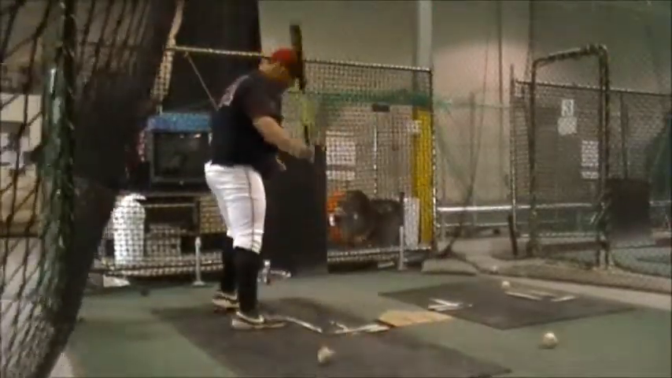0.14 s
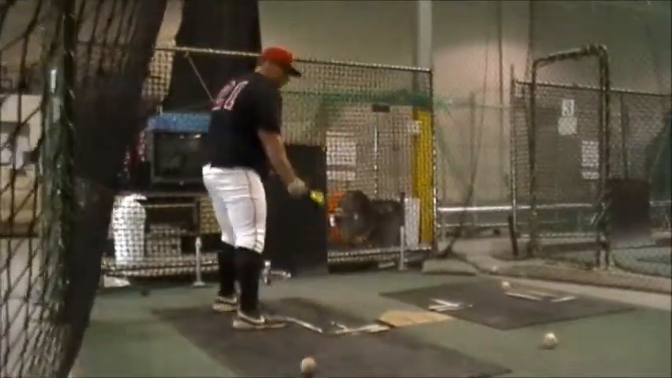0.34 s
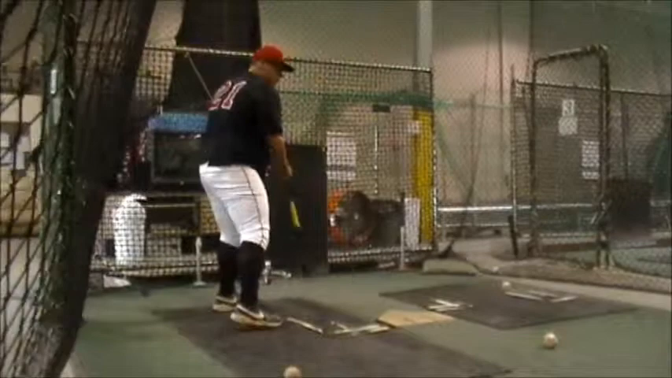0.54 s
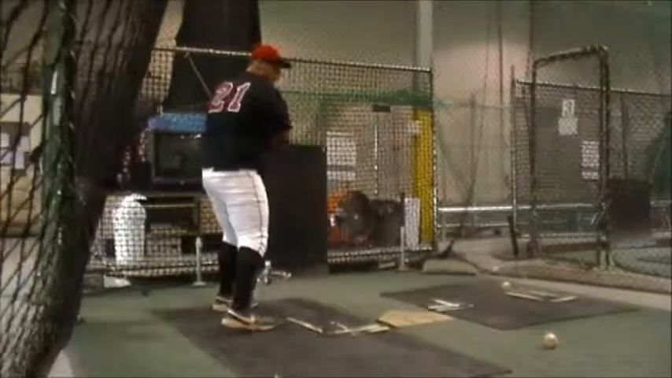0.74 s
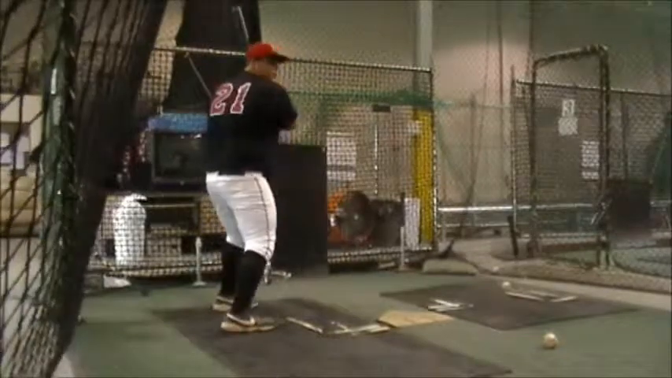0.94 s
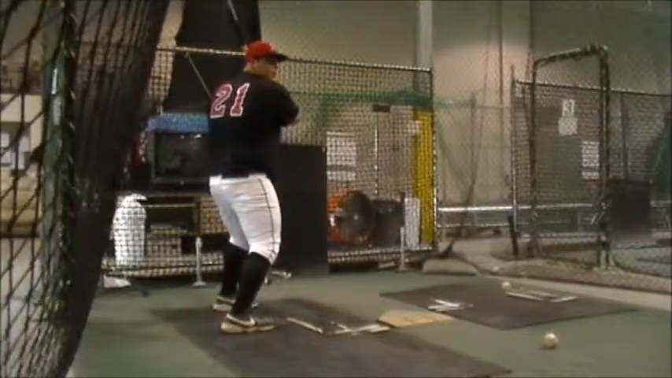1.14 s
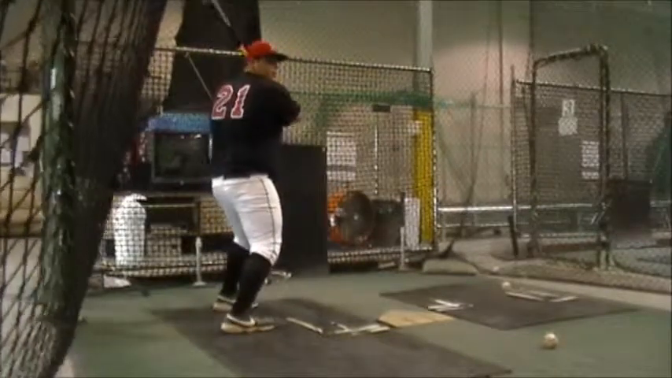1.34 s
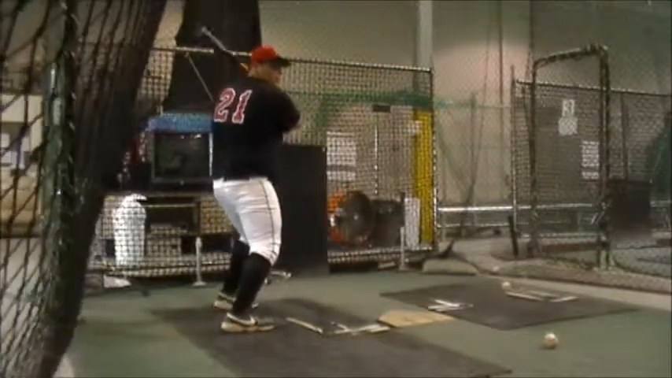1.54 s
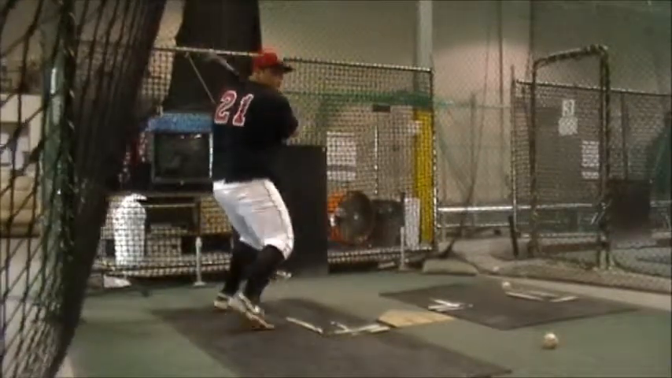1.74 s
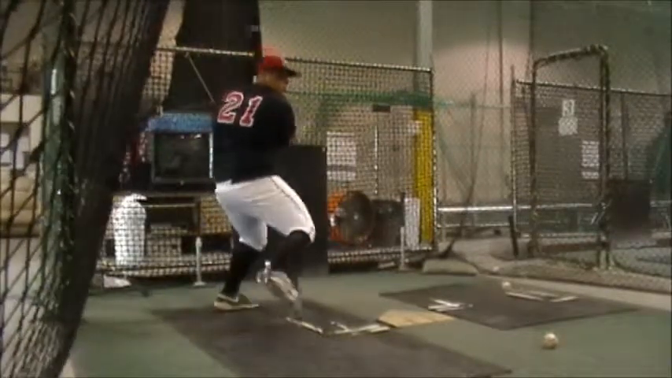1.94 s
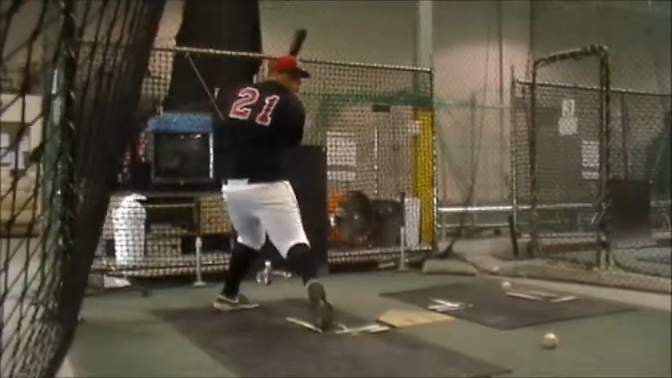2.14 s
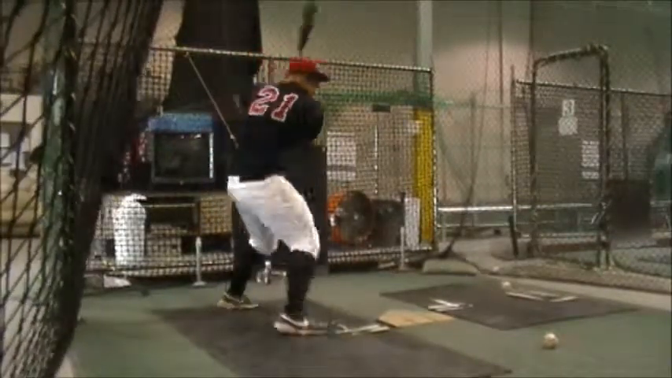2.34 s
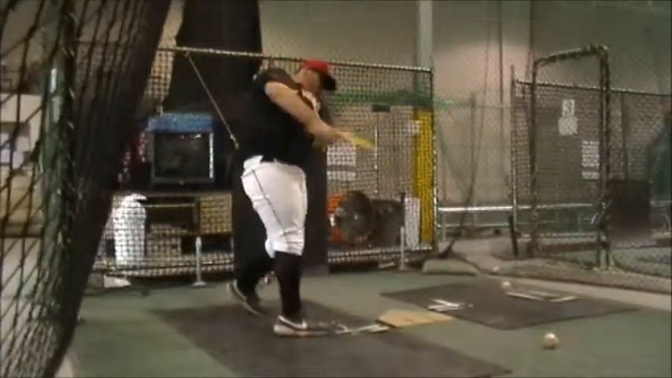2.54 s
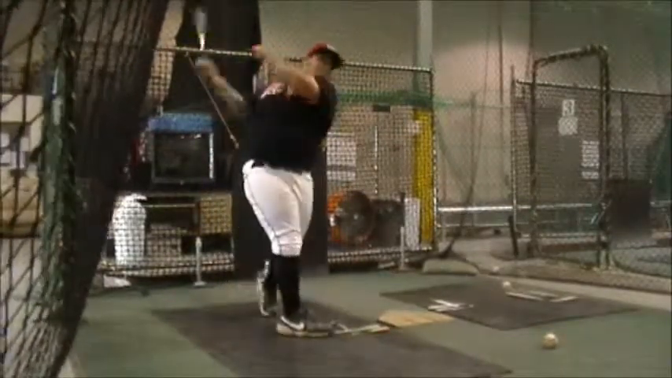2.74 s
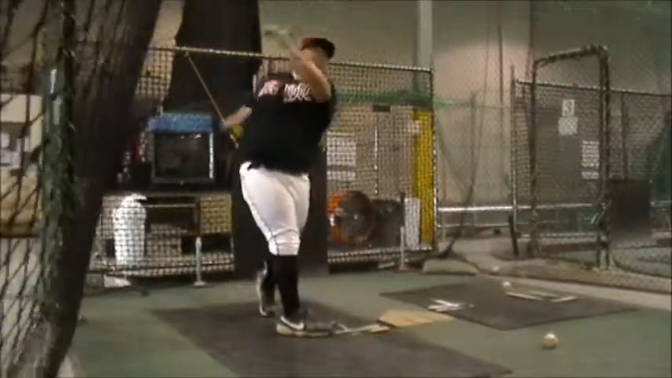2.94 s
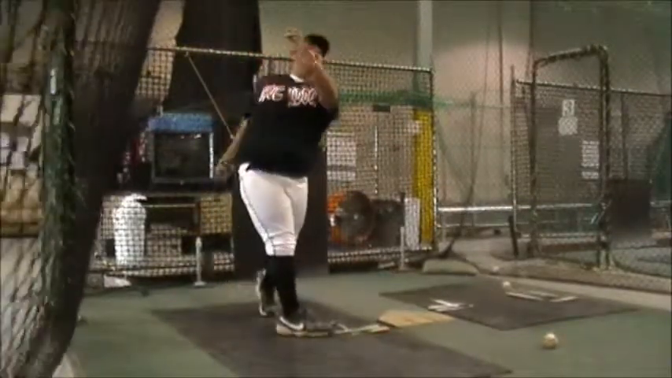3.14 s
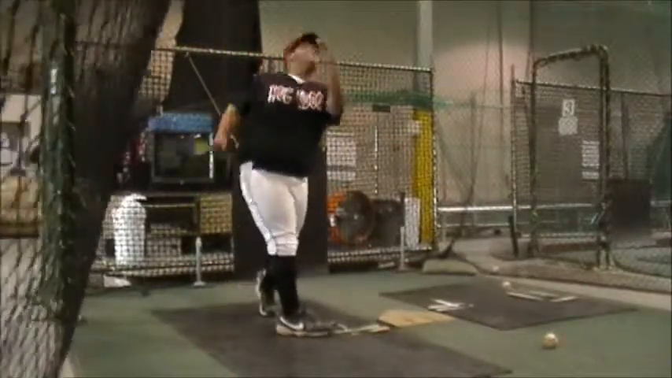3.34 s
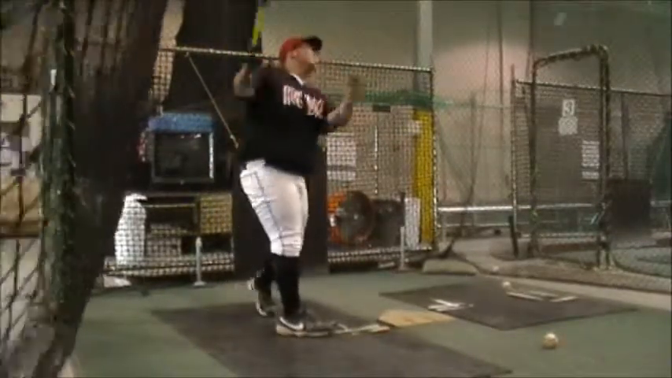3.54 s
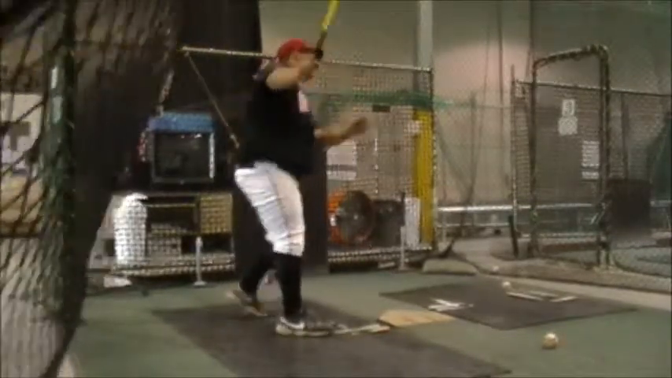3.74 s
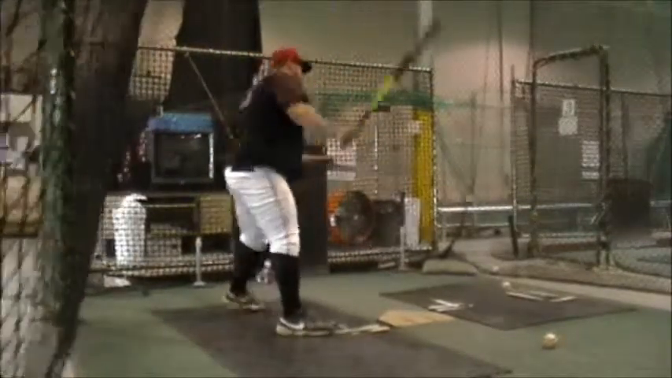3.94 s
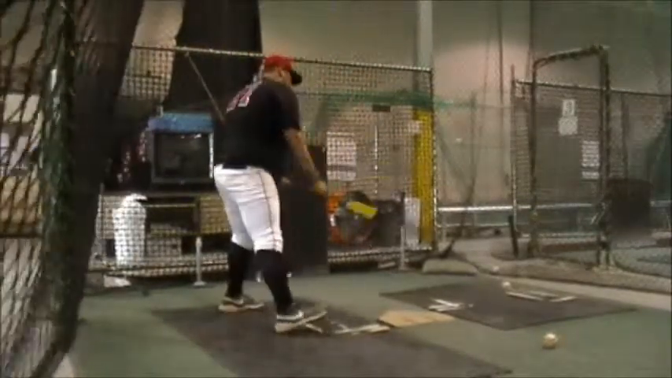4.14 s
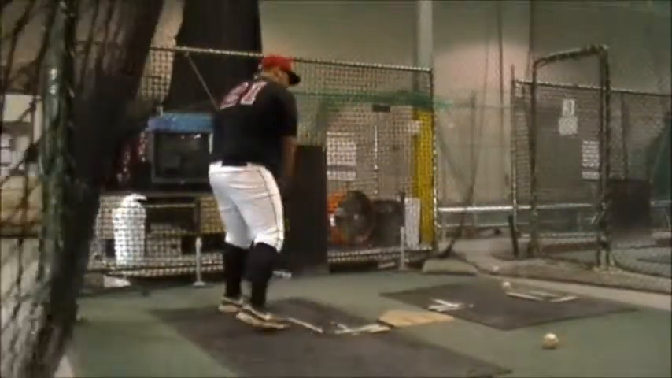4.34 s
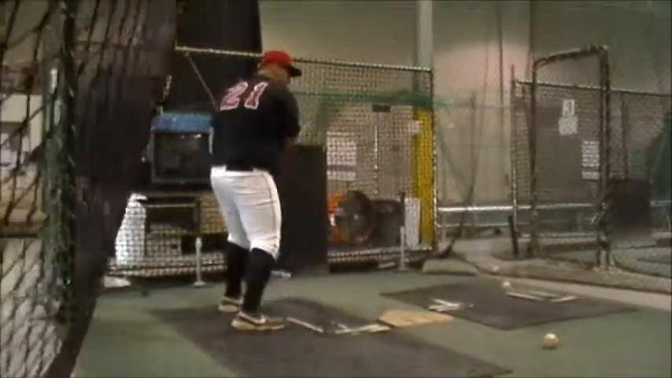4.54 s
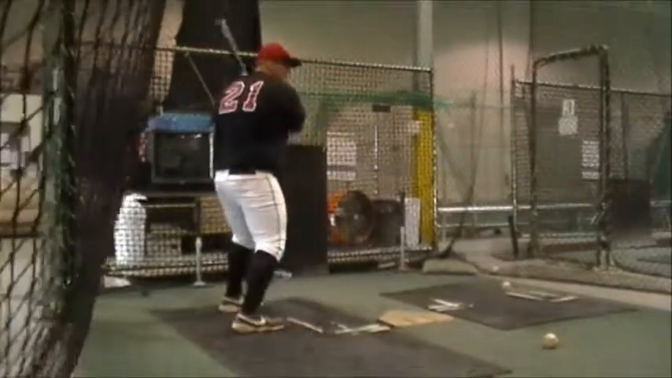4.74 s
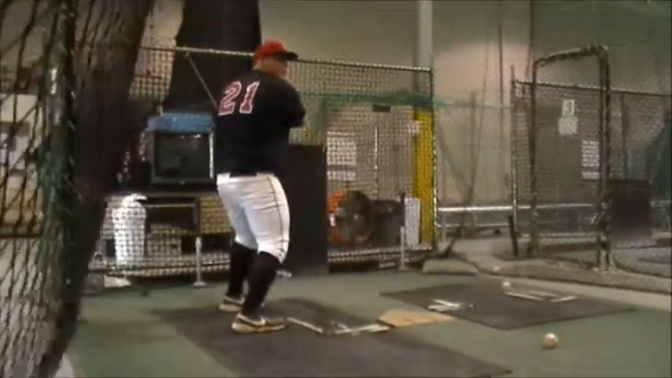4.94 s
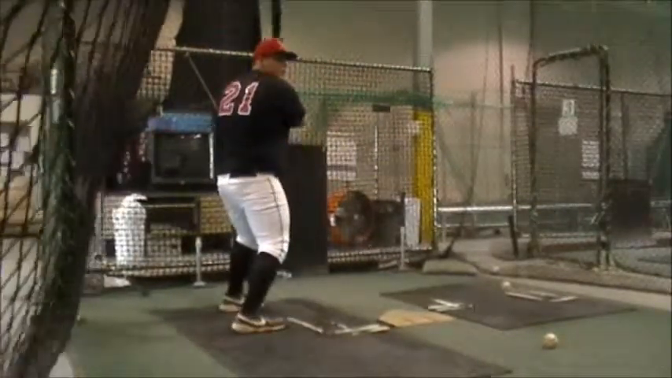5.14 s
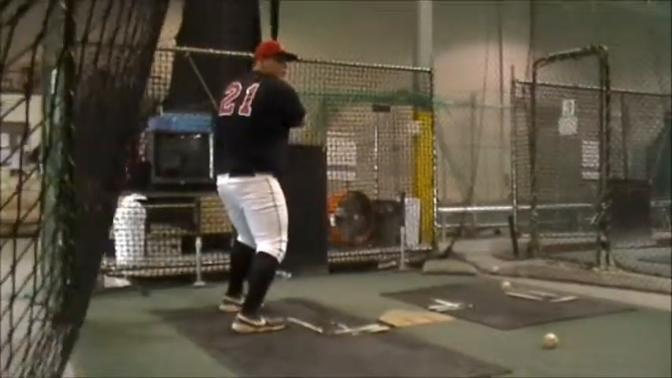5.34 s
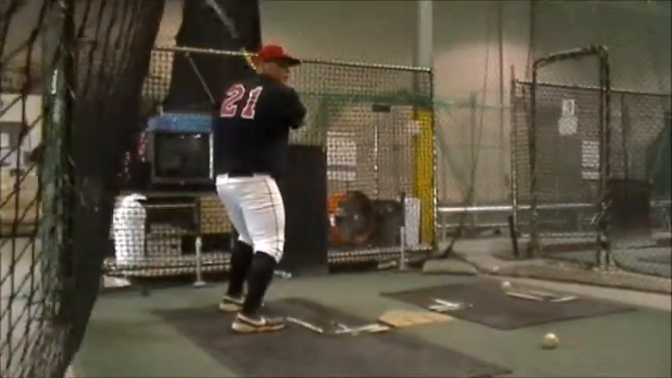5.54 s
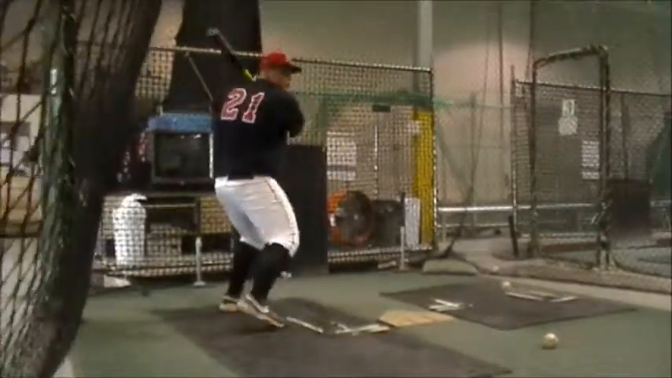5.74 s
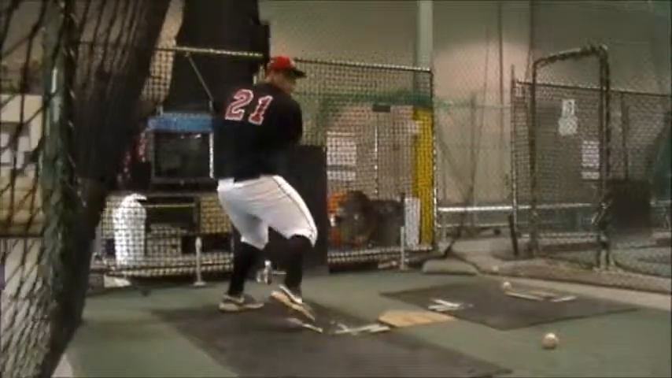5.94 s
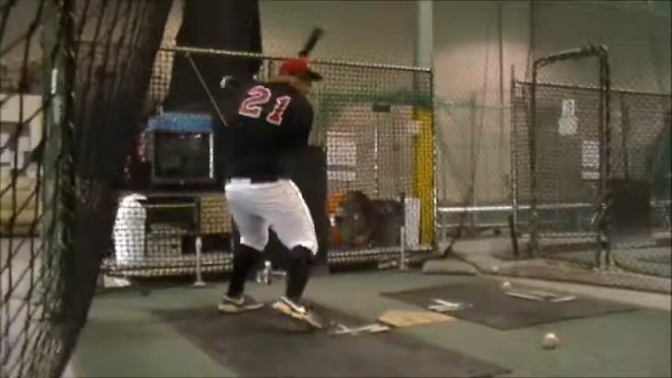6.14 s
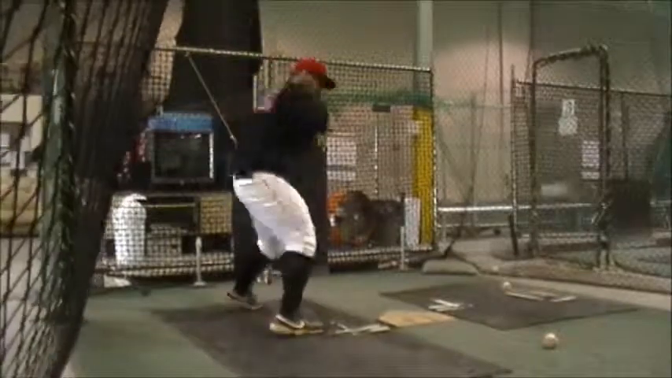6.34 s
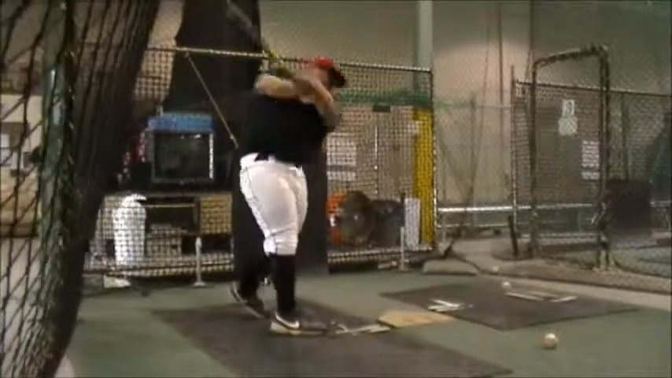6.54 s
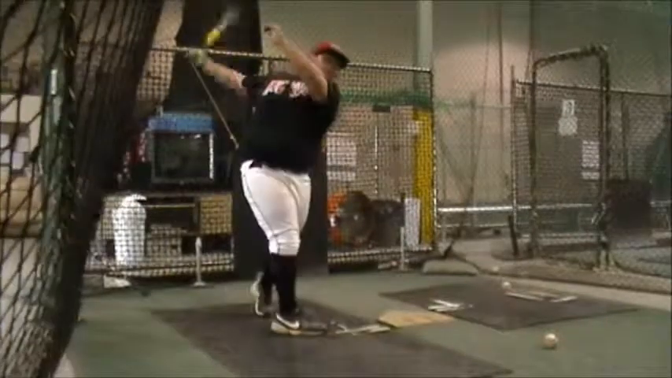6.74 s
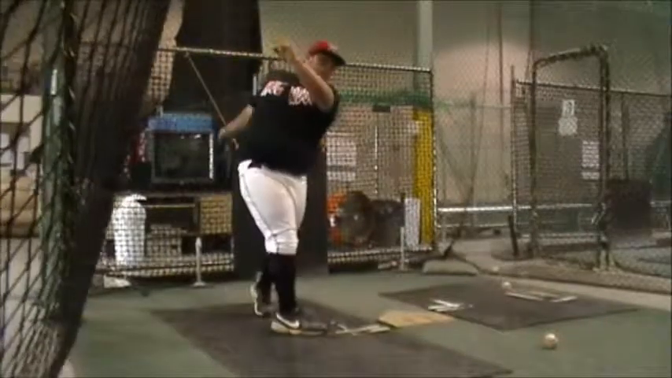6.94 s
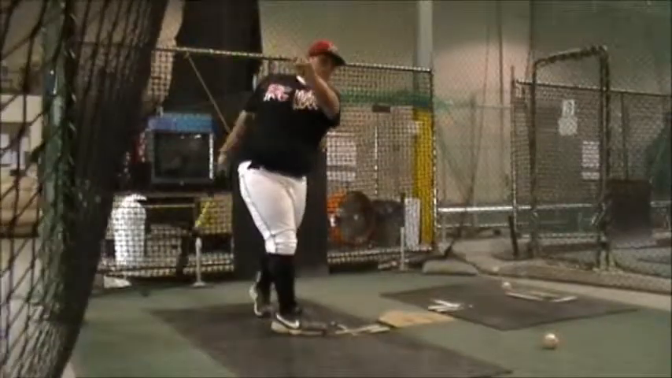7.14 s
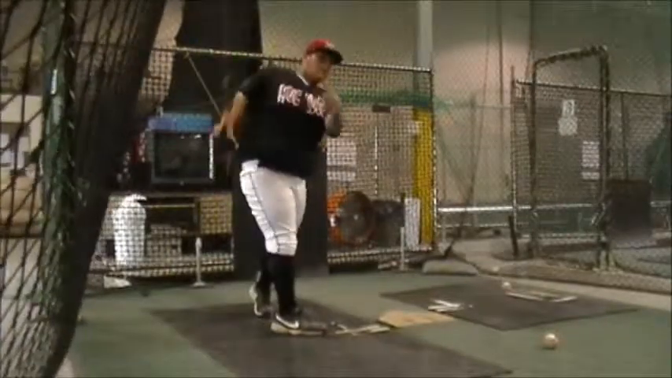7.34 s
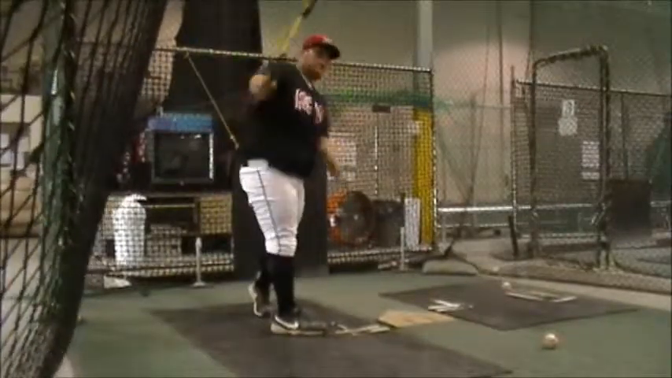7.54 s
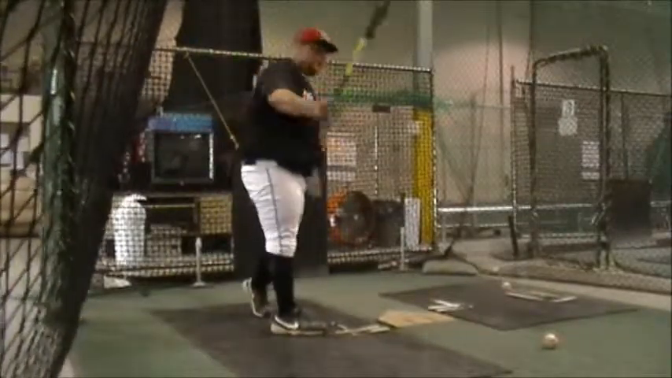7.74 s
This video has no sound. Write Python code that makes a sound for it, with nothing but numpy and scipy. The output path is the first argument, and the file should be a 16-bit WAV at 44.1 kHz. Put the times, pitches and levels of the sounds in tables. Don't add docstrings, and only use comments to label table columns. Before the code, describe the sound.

In a large indoor batting cage, fans hum steadily. A ball thumps quickly across a hollow mat and fades, clothes rustle, then a metal bat cracks sharply and the ball clangs into a steel screen, its tube singing on. Hard-ground knocks and light mesh ticks follow before a second ringing crack, clang and last knocks. A stereo microphone some steps away ducks after loud hits, letting the echo swell back.

```python
import sys
import numpy as np
from scipy import signal
from scipy.fft import rfft, irfft, next_fast_len
from scipy.io import wavfile
from scipy.ndimage import uniform_filter1d, map_coordinates

SR = 44100
rng = np.random.default_rng(int(sys.argv[2]) if len(sys.argv) > 2 else 0)


def gain_from_db(level_db):
    decades = np.asarray(level_db, float) / 20
    return 10 ** decades


def materialize(psi):
    bounded = np.clip(np.atleast_2d(psi).T, -1, 1)
    quanta = np.round(bounded * 32767).astype(np.int16)
    wavfile.write(sys.argv[1], SR, quanta)


N = 344421
TIME = np.arange(N) / SR
T = np.arange(SR // 4) / SR

# (frequency [Hz], density [dB per Hz])
AIR = [(15, -56.5), (25, -33.5), (48, -17), (108, 1), (141, -4), (212, 0.5), (317, -3), (394, -4.5),
       (439, -8), (476, -5), (545, -8), (1020, -6.5), (3720, -19), (5880, -24.5), (16000, -52)]
# (time [s], level [dB])
AIR_LEVEL = [
    [(0.0, -49.5), (7.81, -48)],
]
# (frequency [Hz], left over right [dB])
AIR_PAN = [(60, -0.5), (180, -1.0), (550, 0.0), (1650, 2.5), (4970, 0.5), (15000, 6)]
# (frequency [Hz], width [Hz], level [dB])
FAN_ORDERS = [(58.9, 2.5, -61), (201.2, 48, -60), (260, 18, -66)]
# (on [s], off [s], level [dB])
MOTOR_ON = [
    (0, .97, -69),
    (5.2, 8, -56.5),
]
# (on [s], off [s], level [dB])
WHINE_ON = [
    (0, .97, -90.5),
    (3.3, 7.35, -86),
]
MOTOR_IDLE_DB, WHINE_IDLE_DB, SWITCH_S = -84.5, -92.5, 0.11
FAN_LEAD_RAD, MAT_LEAD_RAD = 0.81, 0.15

# (time [s], peak [dB], pitch [Hz], tick [dB])
BOUNCES = [
    (0.0, -27, 209, -5),
    (0.124, -21.5, 198.5, -16),
    (0.185, -33, 192, -29),
    (0.23, -27, 190, -32),
    (0.358, -36, 184, -27.5),
    (0.445, -33, 185, -31),
    (0.588, -38.5, 260, -20),
    (0.686, -34, 191.3, -20),
    (0.743, -52, 221, -7.5),
    (2.153, -36, 182, -27),
]
DRUM_DB, DRUM_FADE_DB = -40, 19

# (time [s], level [dB], time to gain 10 dB, or if negative to lose 10 dB [s])
RUSTLES = [(0.0, -66, 0.4), (0.127, -69, 0.28), (0.24, -80, -15), (0.62, -69, .2), (1.64, -69.5, 1.6),
           (1.745, -72.5, 0.06), (1.839, -80, -0.45), (2.1, -78, 0.8), (2.4, -52.5, 0.04),
           (2.455, -58, -0.13), (2.582, -43, -0.03), (3.24, -55, .12), (3.65, -64, 0.97),
           (3.76, -57, -0.36), (3.78, -55.5, -0.12), (4.21, -61, 0.06), (4.442, -56.5, -0.15),
           (4.78, -64, 0.6), (4.968, -61, 0.24), (5.25, -67, 0.5), (5.53, -71, .1), (5.75, -66, .02),
           (5.99, -60, .15), (6.33, -60.5, 0.06), (6.52, -52, 0.04), (7.076, -63, -0.24),
           (7.387, -67.5, 1.1), (7.604, -70.5, .1)]
RUSTLE_FALL, STILL_DB = 0.37, -80.5
# (frequency [Hz], density [dB per Hz])
CLOTH = [(600, -28), (1300, 1), (3000, 2), (5000, 3.5), (9000, -5), (13000, -6), (15500, -7.5)]
# (time [s], peak [dB], left over right [dB])
SNAPS = [(0.1241, -54, -2), (0.6875, -56, -4), (1.7174, -48.5, -11), (1.728, -34.5, 2), (1.74, -38, 2),
         (1.7464, -35, 11), (1.8133, -46, 0.5), (3.6925, -70, 4), (3.782, -19, 19), (5.2094, -56, -4),
         (5.742, -38.5, 3)]

# (time [s], peak [dB], body [Hz], tick [dB], hall [dB])
KNOCKS_AHEAD = [
    (0.2822, -33, 444, 8, -13),
    (2.645, -20, 469, -7, -14),
    (3.8943, -7, 679, -6, -5.5),
    (3.8956, -19, 213, -38, -3),
    (3.923, -22.5, 846, 11, -16),
    (3.928, -17, 1190, 11, -13),
    (4.432, -34, 376, -9, -18),
    (6.565, -13, 968, 1.5, -7),
    (6.57, -12.5, 1300, 11, 0.5),
]
# (time [s], peak [dB], body [Hz], tick [dB], hall [dB])
KNOCKS_RIGHT = [
    (3.884, -24, 422, -51, 6),
    (7.0763, -10.5, 870, -2.5, -2),
    (7.608, -23.5, 526, -12, -7.5),
]
AHEAD_PAN_DB, RIGHT_PAN_DB = -3, -12

# (time [s], peak [dB], left over right [dB])
TINKS = [
    (0.687, -43, 2),
    (2.397, -30.5, 5),
    (3.6453, -29, 18),
    (3.695, -31, 8),
    (3.707, -30.5, -11),
    (7.2, -39, 20),
    (7.6037, -35, 0),
]
# (time [s], peak [dB], left over right [dB])
PING = [
    (7.3867, -35, -22.5),
]
# (panel [dB], tube [dB], hall [dB])
TINK_DB = (-22, -35, -20)
# (panel [dB], tube [dB], hall [dB])
PING_DB = (-24, 0, -16.5)
# (time [s], peak [dB], panel [dB], tube [dB], hall [dB])
CLANGS = [
    (2.716, -7, 1, -22, 1.5),
    (6.657, -13.5, 3.5, -15, -2),
]
SCREEN_PAN_DB = -19
# (frequency [Hz], density [dB per Hz])
MESH = [(300, -69), (1200, -0.5), (2200, -3.5), (3400, -3.5), (4000, 3), (4500, 0), (5400, -1), (7000, -10),
        (11000, -14), (16000, -29.5)]
# (frequency [Hz], level [dB], t60 [s])
PANEL = [(544, -3, 0.024), (697, -3, 0.05), (947, 2.5, 0.02), (1300, 3, 0.011)]
# (frequency [Hz], level [dB], t60 [s])
TUBES = [(3900, 0, .07), (4030, -4, .06), (4950, -8, .04), (6150, -8, .03)]

# (time [s], level [dB], lead of a first puff [s])
SWINGS = [
    (2.593, -27.5, 0.1146),
    (6.523, -29.5, 0.11),
]
SWING_RISE_S, SWING_FALL, PUFF_DB = 0.017, 0.58, -20.5
# (time [s], peak [dB], left over right [dB], hall [dB])
CRACKS = [
    (2.589, -6, 3, -1.5),
    (6.527, -8.5, 4, -1.5),
]
# (frequency [Hz], level [dB], t60 [s])
BARRELS = [
    [(1233, 1, 0.022), (2932, -2.5, 0.1), (3660, -34, 0.0134), (5160, -12, 0.033), (8150, -21, 0.057)],
    [(2874, -3.5, 0.098), (3246, -1.5, 0.055), (3460, 3.5, 0.035), (3340, -15, 0.016), (4360, 1, 0.0294),
     (4930, -20, 0.0189)],
]
# (frequency [Hz], density [dB per Hz])
CRACK = [(150, -5), (500, 1), (1300, -4.5), (2400, -2.5), (3490, 3.5), (4600, -3.5), (7320, -8),
         (11300, -12.5), (16000, -22)]
DOPPLER = [.955, 1]
# (time [s], level [dB], t60 [s])
AFTERRING = [
    (2.72, -26, 1.8),
    (7.387, -53, 0.47),
]
SING_S = 0.11

# (frequency [Hz], t60 [s])
HALL = [(150, 5.45), (500, 1.45), (1500, 2.51), (3500, 1.534), (6000, 0.95), (10000, 0.63), (16000, 0.66)]
# (frequency [Hz], left-right likeness [-1 to 1])
HALL_ALIKE = [(200, 0.918), (550, 0.78), (1300, 0.61), (3500, 0.877), (7000, 1), (9500, 0.97),
              (12000, 0.74), (15500, 0.186)]
# (frequency [Hz], left-right likeness [-1 to 1])
ALIKE = [(60, 0.82), (200, 0.833), (500, 0.563), (1300, 0.75), (3500, 0.933), (7000, 1), (9500, 0.92),
         (12000, 0.6882), (15500, 0.3)]
FLOOR_S, FLOOR_DB = 0.0042, -4
WALL_S, WALL_DB, SETTLE_S, LATE_DB = .032, 3, 0.076, -5
FAR_S, FAR_WIDE_S, FAR_DB = 0.098, 0.02, 2.5

# (frequency [Hz], width [Hz], depth [0 to 1])
NOTCHES = [(5740, 420, 1), (7253, 570, 0.64)]
# (frequency [Hz], left ahead of right [rad])
PORTS = [(0, 0), (16200, 0.068)]
# (frequency [Hz], share [0 to 1])
SIDEWAYS = [(60, 1), (200, 1), (550, 0.9), (1300, 1), (3500, 0.44), (7000, 0.17), (13000, 0.68)]
TOP_HZ = 15900
# (time [s], sudden drop [dB], further sag [dB], release [s], overshoot [dB])
DUCKS = [
    (2.584, 9, 5, 0.23, -1),
    (2.717, 11.5, 7.5, 0.59, 0.6),
    (3.895, -0.2, -0.3, 0.068, 0.5),
    (6.525, 12.5, 5.5, 0.18, 1),
    (6.66, 7.5, 3.5, 0.67, 1.5),
]
GRAB_S, SAG_S, SAG_BACK_S = .004, 0.059, 0.083
HOLD, OVER_S, EASE_S = 0.27, 0.613, 0.065


def along(points, hz):
    f, v = np.transpose(points)
    return np.interp(np.log(hz + 1), np.log(f + 1), v)


def unit(x):
    return x / np.sqrt(np.mean(x ** 2) + 1e-20)


def wobble(rate):
    knots = rng.standard_normal(int(N * rate / SR) + 4)
    return map_coordinates(knots, [np.arange(N) * rate / SR])


def filtered(x, response):
    m = next_fast_len(x.shape[-1] + 4096)
    return irfft(rfft(x, m) * response(np.fft.rfftfreq(m, 1 / SR)), m)[..., :x.shape[-1]]


def spread(pair, alike):
    turn = lambda hz: np.arccos(np.clip(along(alike, hz), -1, 1)) / 2
    mid, side = filtered(pair, lambda hz: np.array([np.cos(turn(hz)), np.sin(turn(hz))]))
    return np.array([mid + side, mid - side])


def leading(x, rad):
    return filtered(x * np.ones((2, 1)), lambda hz: np.exp(.5j * rad * np.array([[1], [-1]])) + 0 * hz)


def noise(spectrum, size=N, count=2):
    return unit(filtered(rng.standard_normal((count, size)), lambda hz: gain_from_db(along(spectrum, hz))))


def ring(modes, attack):
    out = 0
    for hz, db, t60 in modes:
        out = out + gain_from_db(db - 60 * T / t60) * np.sin(2 * np.pi * (hz * T + rng.random()))
    return (1 - np.exp(-T / attack)) * out


def swell(s, db, rise, fall):
    u = TIME - s
    return gain_from_db(db + 10 * np.minimum(u / rise, -u / (rise * fall)))


def switched(spans, idle_db):
    level = gain_from_db(idle_db)
    for on, off, db in spans:
        fade = np.minimum(TIME - on, off - TIME) / SWITCH_S + .5 + (on == 0)
        level = level + gain_from_db(db) * np.clip(fade, 0, 1)
    return level


def walls_db(t):
    near = LATE_DB + (WALL_DB - LATE_DB) * np.exp(-(t - WALL_S) / SETTLE_S)
    near = near + FAR_DB * np.exp(-((t - FAR_S) / FAR_WIDE_S) ** 2)
    return np.where(t < WALL_S, FLOOR_DB - 24 * np.clip(1 - t / FLOOR_S, 0, 1), near)


def hall():
    hz, t, z = signal.stft(rng.standard_normal((2, 2 * SR)), SR, nperseg=256)
    tail = signal.istft(z * gain_from_db(-60 * t / along(HALL, hz)[:, None]), SR, nperseg=256)[1]
    tail = spread(tail * gain_from_db(walls_db(np.arange(tail.shape[1]) / SR)), HALL_ALIKE)
    return tail / np.linalg.norm(tail[0])


def duck_db(t):
    gain = 0
    for s, drop_db, sag_db, release, over_db in DUCKS:
        u = t - s
        drop = np.interp(u, [0, GRAB_S, GRAB_S + HOLD * release, release], [0, 1, 1, 0])
        sag = np.interp(u, [0, SAG_S, SAG_S + SAG_BACK_S], [0, 1, 0])
        over = np.interp(u - release, [0, EASE_S, OVER_S, OVER_S + EASE_S], [0, 1, 1, 0])
        gain = gain + over_db * over - drop_db * drop - sag_db * sag
    return gain


def place(out, s, views, db, pan_db, hall_db, room, ratio=1):
    views = np.atleast_2d(views) / np.max(np.abs(views)) * gain_from_db(db - duck_db(s + GRAB_S))
    power = uniform_filter1d(np.mean(np.abs(rfft(views)) ** 2, axis=0), size=64)
    bins = np.fft.rfftfreq(len(T), 1 / SR)
    low_cut = lambda hz: hz ** 2 / (hz ** 2 + 220 ** 2)
    colour = lambda hz: np.sqrt(np.abs(np.interp(hz / ratio, bins, power))) * low_cut(hz)
    wet = gain_from_db(hall_db) * filtered(room[:, :None if db > -24 else SR // 2], colour)
    lean = np.tanh(pan_db * np.log(10) / 40) * views[0] + 0.446 * (views[-1] - views[0])
    side = filtered(lean, lambda hz: along(SIDEWAYS, hz) * np.exp(.5j))
    wet[:, :len(T)] += [views[0] + side, views[0] - side]
    part = out[:, round(s * SR):][:, :wet.shape[1]]
    part += wet[:, :part.shape[1]]


def fans():
    level_db = np.interp(TIME, *np.transpose(AIR_LEVEL[0]))
    air = spread(noise(AIR), ALIKE) * gain_from_db(level_db + 0.76 * wobble(2.6356))
    air = filtered(air, lambda hz: gain_from_db(along(AIR_PAN, hz) * [[.5], [-.5]]))
    for hz, width, db in FAN_ORDERS:
        band = filtered(rng.standard_normal(N), lambda f: 1 / (1 + ((f - hz) / width) ** 4))
        air = air + gain_from_db(db) * leading(unit(band), FAN_LEAD_RAD)
    motor = np.sin(2 * np.pi * 388 * TIME + 1.3 * wobble(12))
    motor = switched(MOTOR_ON, MOTOR_IDLE_DB) * gain_from_db(-1 + 3 * wobble(12)) * motor
    whine = np.sin(2 * np.pi * 12586 * TIME + .8 * wobble(20))
    whine = switched(WHINE_ON, WHINE_IDLE_DB) * gain_from_db(6.5 + 2.9 * wobble(10)) * whine
    return air + motor + whine


def mat_bounces():
    mat, room = np.zeros((2, N)), hall()
    for s, db, hz, tick_db in BOUNCES:
        thump = np.sin(2 * np.pi * hz * T) * np.exp(-T / 0.0096) * (1 - np.exp(-T / 0.00109))
        slap = np.sin(2 * np.pi * 450 * T) * np.exp(-T / 0.00157)
        tick = gain_from_db(tick_db - 11.5) * rng.standard_normal(len(T)) * np.exp(-T / 0.00092)
        place(mat, s + .002, thump + 0.5 * slap + tick, db + 1.5, -1, -12, room)
    drum = noise([(60, -34), (165, -3), (200, -2.5), (240, -8.5), (500, -28.5), (900, -92)], count=1)
    drum = gain_from_db(DRUM_DB - DRUM_FADE_DB * TIME ** 2 + 1.2 * wobble(25)) * drum
    return leading(mat + drum, MAT_LEAD_RAD)


def rustles():
    grains = unit(gain_from_db(1.8 * wobble(250)) * spread(noise(CLOTH), ALIKE))
    return (gain_from_db(STILL_DB) + sum(swell(*row, RUSTLE_FALL) for row in RUSTLES)) * grains


def snaps():
    out, room = np.zeros((2, N)), hall()
    for s, db, pan_db in SNAPS:
        snap = noise(CLOTH, size=len(T), count=4) * (1 - np.exp(-T / 0.00053)) * np.exp(-T / 0.00134)
        place(out, s, snap, db, pan_db, -10, room)
    return out


def ground_knocks():
    out, room = np.zeros((2, N)), hall()
    knocks = [(*k, AHEAD_PAN_DB) for k in KNOCKS_AHEAD] + [(*k, RIGHT_PAN_DB) for k in KNOCKS_RIGHT]
    for s, db, hz, tick_db, hall_db, pan_db in knocks:
        room = hall() if db > -12 else room
        tick = np.sin(2 * np.pi * 2400 * T) * (T / 0.00013) * np.exp(1 - T / 0.00011)
        body = -np.sin(2 * np.pi * hz * T) * np.exp(-T * hz / 0.67) * (1 - np.exp(-T * hz / 0.41))
        place(out, s, 2.0 * body + 1.66 * gain_from_db(tick_db) * tick, db, pan_db, hall_db, room)
    return out


def frame():
    out, room = np.zeros((2, N)), hall()
    hits = [(s, db, SCREEN_PAN_DB, *rest) for s, db, *rest in CLANGS]
    hits += [(*touch, *TINK_DB) for touch in TINKS]
    hits += [(*touch, *PING_DB) for touch in PING]
    for s, db, pan_db, panel_db, tube_db, hall_db in hits:
        room = hall() if db > -20 else room
        shake = T / (0.00065 + 0.0038 * gain_from_db(panel_db))
        rattle = noise(MESH, size=len(T), count=12) * shake * np.exp(1 - shake)
        steel = gain_from_db(tube_db + 10) * ring(TUBES, 0.0042) + gain_from_db(panel_db) * ring(PANEL, 0.0016)
        place(out, s, np.tanh(.5 * (rattle + steel)), db, pan_db, hall_db, room)
    return out


def swings():
    push = noise([(25, -10), (60, 2), (160, 3), (350, -23), (1000, -15.5), (3000, -35.5)])
    push = spread(push, [(50, 0.225), (200, 0.89)])
    level = 0
    for s, db, lead in SWINGS:
        level = level + swell(s, db, SWING_RISE_S, SWING_FALL)
        level = level + swell(s - lead, db + PUFF_DB, SWING_RISE_S, fall=1.84)
    return level * push


def bat():
    out = np.zeros((2, N))
    for (s, db, pan_db, hall_db), modes, ratio in zip(CRACKS, BARRELS, DOPPLER):
        crack = noise(CRACK, size=len(T), count=12) * gain_from_db(-60 * np.maximum(T - .006, 0) / 0.0047)
        blow = 0.37 * crack + ring(modes, 0.0058)
        place(out, s, np.tanh(1.1 * blow), db, pan_db, hall_db, hall(), ratio)
    return out


def singing_tube():
    out = 0
    for s, db, t60 in AFTERRING:
        pair = np.sin(2 * np.pi * 3885 * TIME + 1.1 * wobble(30))
        pair = pair + 1.1 * np.sin(2 * np.pi * 4010 * TIME + 1.1 * wobble(30))
        rise = np.clip((TIME - s) / (SING_S * t60), 0, 1)
        out = out + rise * gain_from_db(db - 60 * np.abs(TIME - s) / t60) * pair
    return out


def scene():
    steady = fans() + rustles()
    ball_and_steel = mat_bounces() + ground_knocks() + frame() + singing_tube()
    return steady + ball_and_steel + snaps() + swings() + bat()


def top_cut(x):
    return signal.sosfilt(signal.butter(12, 16660, fs=SR, output="sos"), x)


def record(dry):
    housing = lambda f: np.prod([1 - min(d, .99) / (1 + 2j * (f - hz) / w) for hz, w, d in NOTCHES], axis=0)
    band = lambda f: (f < TOP_HZ) * (1j * f / (30 + 1j * f)) ** 2
    ports = lambda f: np.exp(.5j * along(PORTS, f) * [[1], [-1]])
    mix = filtered(dry, lambda f: housing(f) * band(f) * ports(f)) * gain_from_db(duck_db(TIME))
    mix = mix / (1 + np.abs(mix / 0.65) ** 4) ** 0.22
    return top_cut(mix)


dry = scene()
out = record(dry)
materialize(out)
```